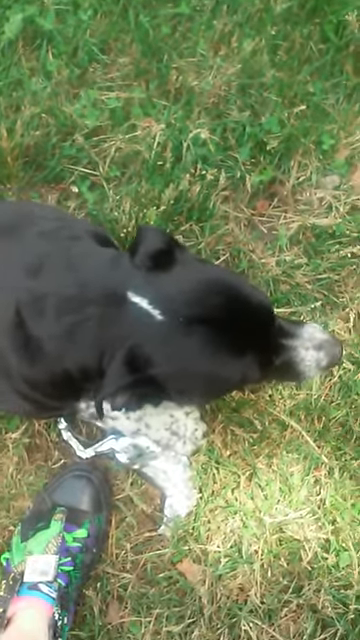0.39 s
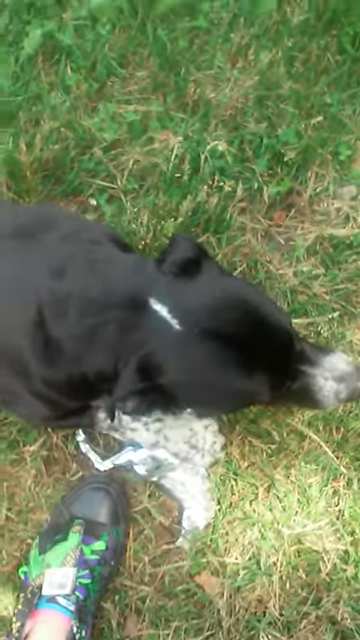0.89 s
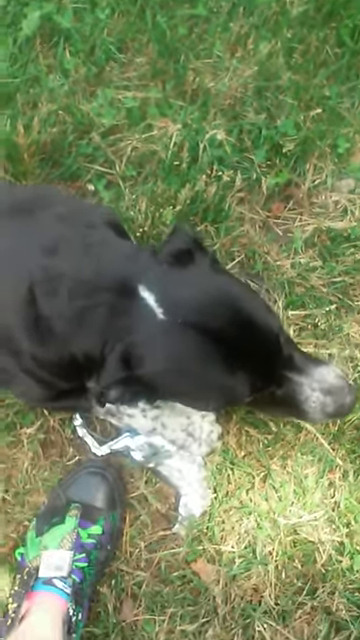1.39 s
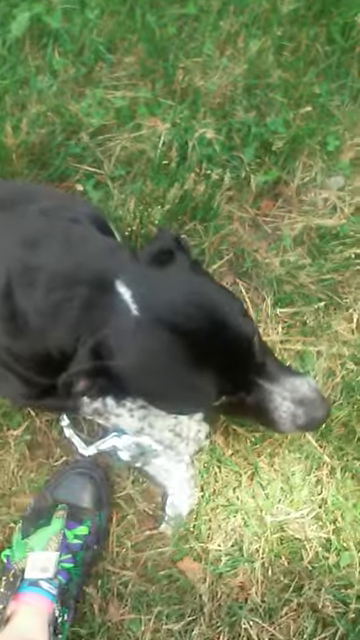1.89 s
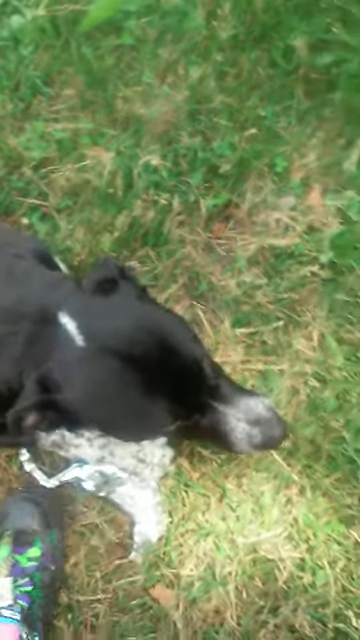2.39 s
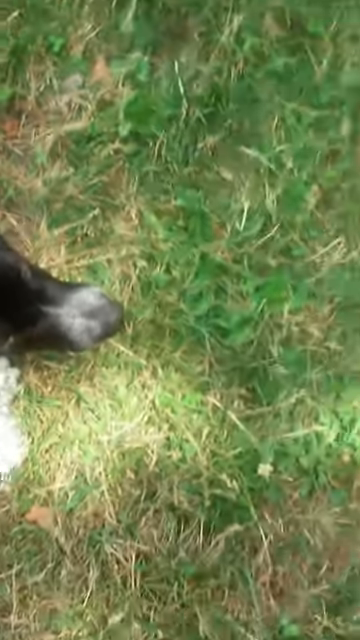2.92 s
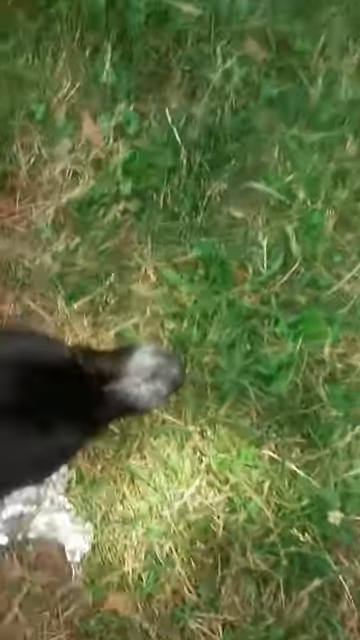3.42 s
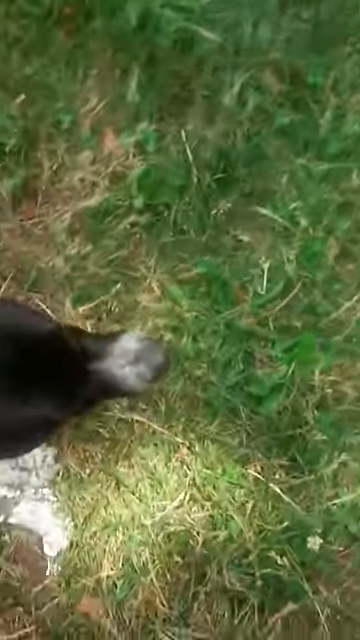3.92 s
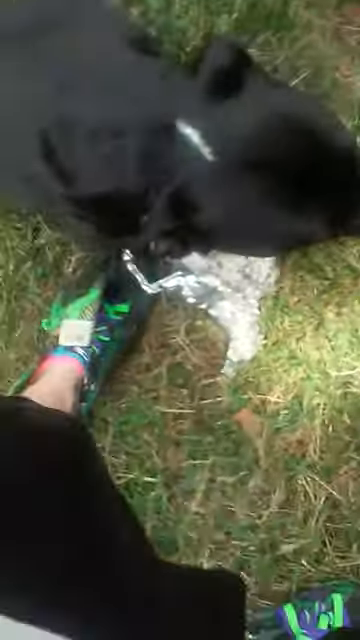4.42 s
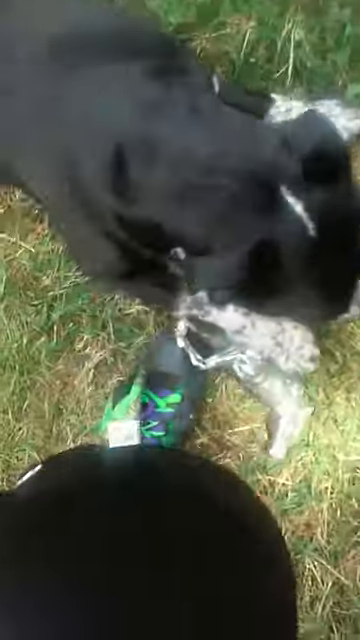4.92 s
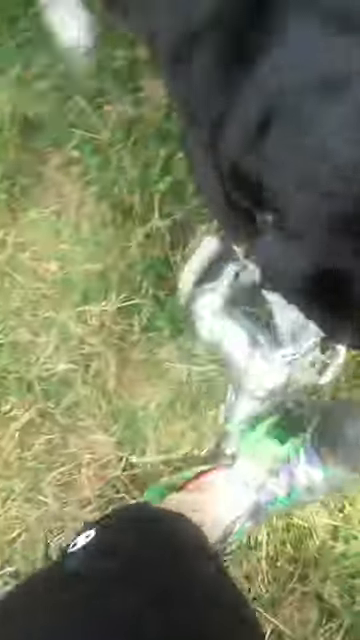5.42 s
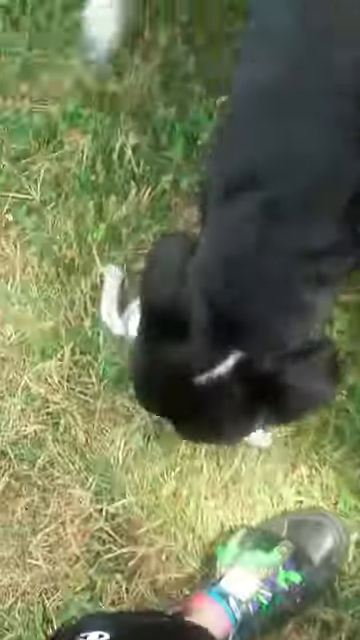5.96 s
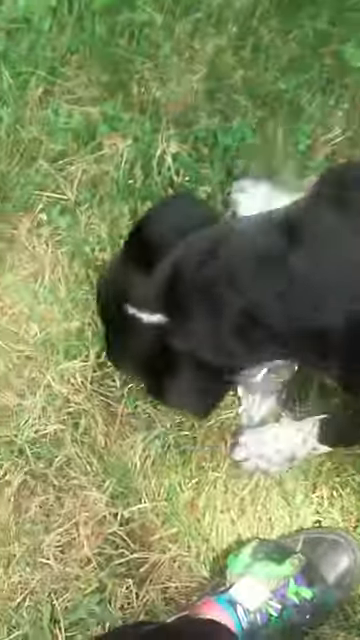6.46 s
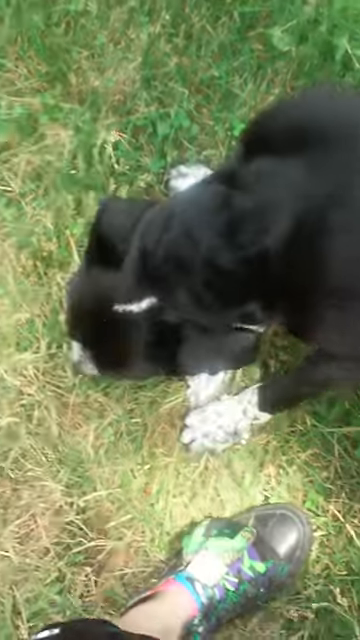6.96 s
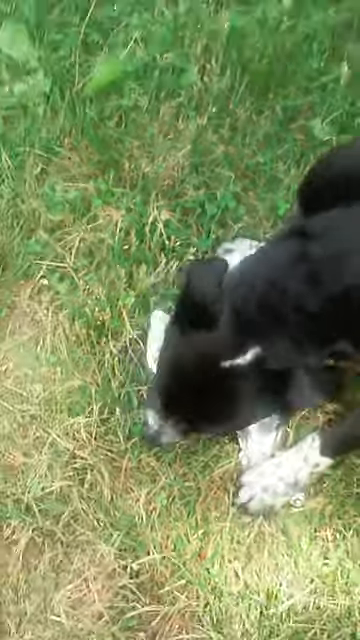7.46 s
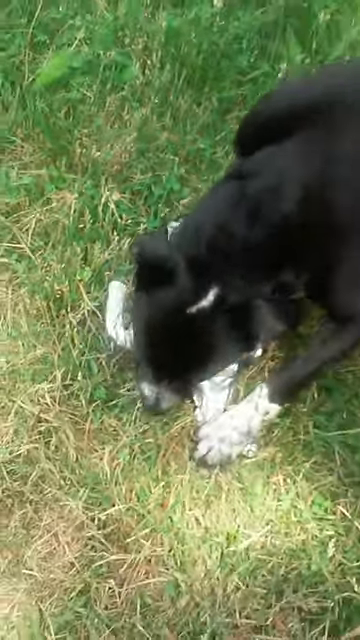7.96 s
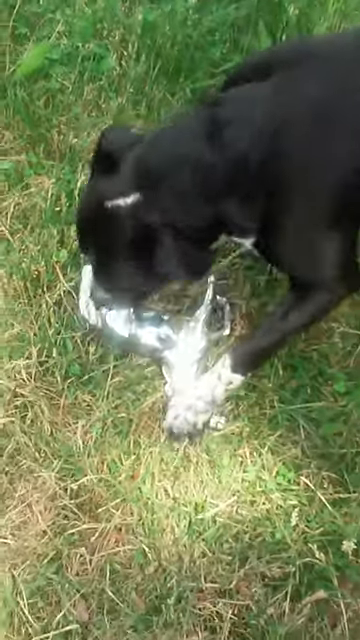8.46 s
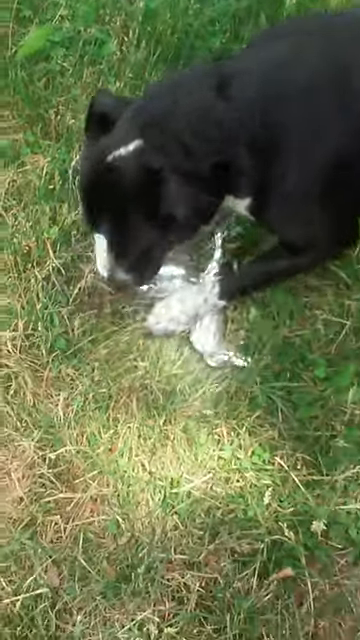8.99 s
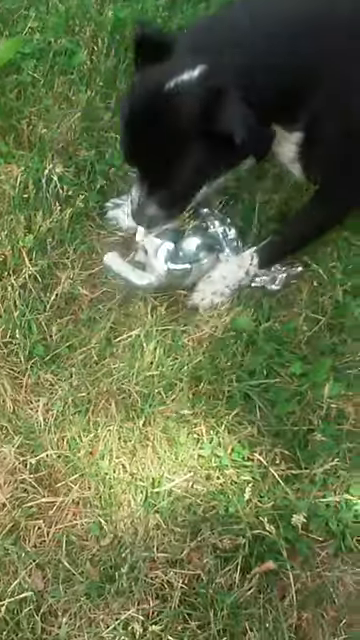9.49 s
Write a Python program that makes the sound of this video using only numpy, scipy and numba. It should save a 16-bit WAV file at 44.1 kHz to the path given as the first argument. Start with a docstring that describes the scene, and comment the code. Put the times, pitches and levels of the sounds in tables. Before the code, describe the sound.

A dog close by growls roughly, yaps sharply and snorts over a toy on dry grass, then gives short muffled grunts with faint collar clinks.

```python
"""Dog growling over its toy on a lawn

A dog close to a phone growls, yaps and grunts: pitched, rough pulses through moving mouth, throat and upper resonances.
Between calls it snorts (low thumps, noise through the nose); struck metal modes clink on its collar.
Dry grass hisses in noise grains that rise with the calls, over outdoor noise, hum, low noise and a yard return.
Loud yaps overload the input."""
import sys
import numpy as np
from scipy import signal
from scipy.io import wavfile
from scipy.ndimage import uniform_filter1d, minimum_filter1d
from numba import njit

SR = 44100
rng = np.random.default_rng(int(sys.argv[2]) if len(sys.argv) > 2 else 0)


def wav_record(signal):
    """Record a signal, one row per channel, as 16-bit PCM in the file named by sys.argv[1]."""
    frames = np.transpose(np.atleast_2d(signal))
    bounded = np.clip(frames, -1, 1)
    # unit amplitude maps onto the largest positive 16-bit level
    quanta = np.round(bounded * 32767).astype(np.int16)
    wavfile.write(sys.argv[1], SR, quanta)


def rack_gain(trim_db):
    """Turn a fader trim in dB into the linear factor to multiply a signal by."""
    fader = np.asarray(trim_db, float)
    return 10 ** (fader / 20)


N = 423801
TIME_S = np.arange(N) / SR


def rms_one(x):
    """Scales to rms 1."""
    return x / np.sqrt(np.mean(x ** 2) + 1e-20)


def evened(x):
    """Level held near rms 1 over 30 ms, so that a gain curve alone sets loudness."""
    return x / np.sqrt(uniform_filter1d(x ** 2, size=1300) + 1e-12)


def in_time(rows):
    """Interpolates each column over the first one, time [s]."""
    s, *columns = np.transpose(rows)
    return [np.interp(TIME_S, s, c) for c in columns]


def cut(x, hz, kind, order=2):
    """Butterworth filter."""
    return signal.sosfilt(signal.butter(order, hz, kind, fs=SR, output="sos"), x)


def lagged(x, seconds):
    """One-pole lag."""
    r = np.exp(-1 / (seconds * SR))
    return signal.lfilter([1 - r], [1, -r], x)


def settling(gain, db_per_s):
    """Follows a rise at once and sinks at no more than a steady rate."""
    ramp = db_per_s * TIME_S
    return rack_gain(np.maximum.accumulate(20 * np.log10(gain + 1e-6) + ramp) - ramp)


def swells(rows, attack_s, release_s):
    """Sum of attack, hold and release shapes; rows: start [s], length [s], level [dB]."""
    out = np.zeros(N)
    for s, length_s, db in rows:
        corners_s = [s - attack_s, s, s + length_s, s + length_s + release_s]
        out += rack_gain(db) * np.interp(TIME_S, corners_s, [0, 1, 1, 0]) ** 2
    return out


def drift(rate_hz):
    """Random wander of rms 1: white noise through two equal low-pass poles."""
    r = np.exp(-2 * np.pi * rate_hz / SR)
    wander = signal.lfilter([1], [1, -2 * r, r * r], rng.standard_normal(N + SR))
    return rms_one(wander[SR:])


def coloured(spectrum, patchy_db):
    """Third-octave bands of noise, each at its level and with its own flicker; rms 1."""
    hz, db = np.transpose(spectrum)
    edges_hz = 25 * 2 ** np.arange(0, 9.6, 1 / 3)
    white = rng.standard_normal((2, N))
    out = 0
    for k, (low, high) in enumerate(zip(edges_hz, edges_hz[1:])):
        level_db = np.interp(np.log(low * high) / 2, np.log(hz), db, left=-90, right=-90)
        out = out + rack_gain(level_db + patchy_db * drift(29)) * cut(white[k % 2], [low, high], "band")
    return rms_one(out)


@njit
def resonate(x, hz, width_hz, sr):
    """Two-pole resonance whose centre may move; gain 1 on top."""
    y, r = np.zeros(len(x)), np.exp(-np.pi * width_hz / sr)
    for i in range(2, len(x)):
        driven = (1 - r * r) / 2 * (x[i] - x[i - 2])
        y[i] = driven + 2 * r * np.cos(2 * np.pi * hz[i] / sr) * y[i - 1] - r * r * y[i - 2]
    return y


def tract(x, shapes):
    """Fixed resonances in parallel, signs alternating."""
    out = np.zeros(N)
    for k, (hz, width_hz, db) in enumerate(shapes):
        out += (-1) ** k * rack_gain(db) * resonate(x, np.full(N, float(hz)), width_hz, SR)
    return out


def struck(times_s, levels_db, modes, spread_db):
    """Each blow rings every decaying mode with a strength of its own."""
    out, at = np.zeros(N), (np.array(times_s) * SR).astype(int)
    chance = rng.standard_normal((len(at), len(modes)))
    for k, (hz, db, t60_s) in enumerate(modes):
        clicks = np.full(N, 1e-18)
        clicks[at] = rack_gain(levels_db + db + spread_db * chance[:, k])
        r, w = rack_gain(-60 / (t60_s * SR)), 2 * np.pi * hz / SR
        out += signal.lfilter([0, np.sin(w)], [1, -2 * r * np.cos(w), r * r], clicks)
    return out


def calls():
    """Every yap, grunt and growl as rows of time [s], pitch [Hz], effort [dB], in order."""
    # lone yaps: (start [s], top pitch [Hz], effort [dB], stretch of the shape)
    lone_yaps = [(0.452, 462.8, -5, 0.97), (0.985, 463.4, -4.5, 0.98), (1.517, 447.6, -4.5, 0.99),
                 (6.312, 501.6, -2.5, .93)]
    # shape shared by the yaps: (time before stretch [s], share of top pitch, level re effort [dB])
    yap_shape = [(0, .25, -34.5), (.02, .55, -7), (.045, .86, -3.5), (.08, 0.99, 1), (.16, .97, 2.5),
                 (.2, .62, -16.5), (.245, .27, -26), (0.312, .22, -46.5)]
    # short grunts: (start [s], length [s], top pitch [Hz], effort [dB])
    short_grunts = [(-.07, .265, 222, -15), (5.535, .09, 199.3, -37.5), (6.717, .16, 236, -20),
                    (7.033, .135, 236, -18), (7.195, .08, 165, -30), (7.322, .135, 238, -19),
                    (8.081, .075, 200, -45.5), (8.504, .095, 240, -23.5), (8.726, .235, 236, -15),
                    (9.098, .255, 262, -15.5), (9.498, .2, 258, -18)]
    # long growls, some flipping up into a yap, one table each: (time [s], pitch [Hz], effort [dB])
    growls = [
        [(2.075, 100.1, -33.5), (2.145, 106.7, -28.5), (2.181, 187.8, -21), (2.365, 177, -23),
         (2.555, 193.7, -28.5), (2.59, 168, -48.5)],
        [(2.8, 178.7, -41.5), (2.852, 213, -13.5), (3.086, 213, -17), (3.126, 238.4, -11), (3.205, 460.2, -0.5),
         (3.3, 483.2, -0.5), (3.334, 329.3, -14.5), (3.528, 262.1, -11), (3.59, 204.6, -54)],
        [(3.875, 201, -37.5), (3.915, 221.3, -8.5), (3.971, 414.4, -2), (4.033, 502.5, 5.5),
         (4.115, 314.8, -14), (4.443, 307.8, -10), (4.52, 415.3, -5), (4.575, 453, -1.5), (4.61, 324.2, -4),
         (4.68, 321, -18), (4.73, 201.9, -34)],
        [(4.745, 170.3, -26), (4.779, 162, -19.5), (4.951, 146.6, -31.5), (5.01, 144.8, -51)],
        [(5.04, 198.8, -38.5), (5.052, 293, -3.5), (5.089, 472, -5), (5.141, 514.4, -3.5), (5.17, 474.9, -6),
         (5.19, 399.2, -15.5), (5.24, 235, -20), (5.29, 225.2, -8), (5.38, 200, -14.5), (5.49, 157.3, -32),
         (5.505, 151.3, -49.5)],
        [(5.76, 227.2, -51.5), (5.794, 303.6, -11), (5.978, 340, -9.5), (6.148, 208, -23.5),
         (6.17, 184.8, -59.5)],
    ]
    out = [list(map(tuple, g)) for g in growls]
    for s, hz, db, stretch in lone_yaps:
        out.append([(s + stretch * after, hz * share, db + under) for after, share, under in yap_shape])
    for s, length_s, hz, db in short_grunts:
        end_s = s + length_s
        out.append([(s, hz * .66, db - 21),
                    (s + min(.058, length_s / 2), hz, db),
                    (end_s - min(.05, length_s / 2.2), hz * .94, db - 7),
                    (end_s, hz * .52, db - 28.5)])
    return sorted(out)


def effort():
    """Pitch [Hz], pressure gain and the on-off gate of the voice."""
    every_call = calls()
    rows = np.concatenate(every_call).astype(float)
    rows[:, 2] = rack_gain(rows[:, 2] / 2)   # swells run between even dB and even pressure
    pitch_hz, root = in_time(rows)
    sounding = np.zeros(N)
    for c in every_call:
        start_s, end_s = c[0][0], c[-1][0]
        sounding += np.interp(TIME_S, [start_s - .008, start_s, end_s, end_s + .03], [0, 1, 1, 0])
    return pitch_hz, root ** 2, np.minimum(sounding, 1)


def background_opening():
    """Background opening, 0-1: rises at once with each call, then sinks steadily in dB."""
    _, gain, sounding = effort()
    half_open_db = -18
    return settling(sounding * gain / (gain + rack_gain(half_open_db)), db_per_s=127.5)


def larynx(pitch_hz):
    """The folds hold each setting until the next; high pitch locks them and clears the voice."""
    # (from time [s], roughness [0-1], flutter of the loose folds [0-1])
    settings = [(0, .25, .2), (.3, .7, .15), (2.0, .55, .5), (2.16, .3, 1), (2.7, .2, .4), (3.14, .8, .25),
                (3.43, .35, 0), (3.7, .8, .5), (4.72, .9, .6), (5.6, .8, .8), (6.07, .3, .2),
                (6.25, .8, .2), (6.68, .28, .2), (7.18, 1, .5), (7.31, .35, .25), (8.79, .2, .2),
                (9.0, .65, .45), (9.25, .35, .2)]
    since_s, *columns = np.transpose(settings)
    now = np.searchsorted(since_s, TIME_S, "right") - 1
    rough, flutter = (uniform_filter1d(c[now], size=1300) for c in columns)
    flip_hz, flip_settles_s, flip_rough = 410, .028, .13
    flip = 1 / (1 + np.exp((flip_hz - pitch_hz) / 12))
    flip = np.minimum(flip, lagged(flip, flip_settles_s))
    return flip, rough + flip * (flip_rough - rough), flutter * (1 - flip)


def glottis(pitch_hz, rough, flutter, flap):
    """Pitch cycles made unsteady by flutter and roughness: pulse size, cosine phase and leaking air."""
    jitter = .07 * flutter * flap + .25 * rough ** 1.5 * drift(70)
    cycles = np.cumsum(pitch_hz * (1 + jitter)) / SR
    chance_per_cycle = rng.standard_normal(N)[(cycles + .5).astype(int)]
    size = rack_gain(2.6 * rough * chance_per_cycle)
    wave = np.cos(2 * np.pi * cycles)
    puff = rng.standard_normal(N) * (1.3 + wave)   # air leaks while the folds are open
    return size, wave, puff


def mouth_and_throat(source, breathy, pitch_hz, rough, sounding, down):
    """The mouth resonance opens to the second harmonic and closes late, beside throat and pharynx."""
    # below the mouth resonance: (centre [Hz], width [Hz], level [dB])
    throat_shape = [(381.5, 61, -7.5)]
    # breathy resonances, head raised and head bent: (centre [Hz], width [Hz], level [dB])
    pharynx_up = [(582.7, 85, -0.11), (1202, 203, 0.95)]
    pharynx_down = [(696, 1700, -30.5), (1150, 2300, -19)]
    shut_hz, tunes_to_harmonic, closes_s, width_hz = 724, 2.11, .011, 84
    jaw_hz = np.maximum(shut_hz, tunes_to_harmonic * pitch_hz)
    mouth_hz = np.maximum(jaw_hz, shut_hz + lagged(sounding * (jaw_hz - shut_hz), closes_s))
    mouth = resonate(source, mouth_hz, width_hz, SR)
    mouth -= (1.3 - rough + .38 * down) * tract(source, throat_shape)
    mouth = np.where(down, cut(mouth, 844, "low", order=4), mouth)   # the toy muffles the bent head
    mouth -= .5 * np.where(down, tract(breathy, pharynx_down), tract(breathy, pharynx_up))
    return cut(cut(mouth, 260, "high", order=4), 1096, "low", order=6)


def upper_resonances(breathy, third_hz, down):
    """A moving third resonance and, above it, fixed ones that depend on the posture."""
    # head raised and head bent: (centre [Hz], width [Hz], level [dB])
    upper_up = [(2285, 110, -15.5), (2877, 81, -12.5), (3700, 130, -43)]
    upper_down = [(2730, 84, -37), (3230, 420, -19), (4130, 73, -13.5)]
    third = resonate(breathy, third_hz, 310.0, SR)
    third = resonate(third, third_hz, 310.0, SR)   # twice: dark valleys beside it
    upper = third - np.where(down, tract(breathy, upper_down), tract(breathy, upper_up))
    return cut(upper, 1400, "high", order=6)


def rasp(puff, pitch_hz, throat_gain):
    """Turbulence: grows steeply with effort up to a cap, only when the voice flips up into a yap."""
    noise = evened(cut(cut(puff, [2500, 7500], "band"), 4200, "low", order=1))
    level_db = -32 + 5.1 * (20 * np.log10(throat_gain) + 2.56)
    return rack_gain(np.minimum(level_db, -24)) * noise / (1 + np.exp((400 - pitch_hz) / 15))


def exhale(flip, throat_gain):
    """Band of noise that lags behind a yap: air rushing out."""
    noise = rms_one(cut(rng.standard_normal(N), (2300, 6450), "band"))
    return rack_gain(-33.5) * lagged(flip * np.minimum(throat_gain, 1), .12) * noise


def voice():
    """Glottal pulses, unsteady and breathy when rough, through mouth, throat and upper resonances."""
    # posture: (time [s], third resonance [Hz], chest toward the microphone [dB], muzzle toward it [dB])
    neck = [(0.1, 1830, 7, 2), (0.55, 1580, 6, -2), (1.1, 1750, 7, -6), (1.65, 1950, 2.5, -5.5),
            (2.3, 1843, 2.3, -3), (3.0, 1920, 5.5, -2.1), (3.4, 1866, 3.5, -7.7), (4.3, 1870, 3.5, -10.5),
            (4.85, 1440, 2.5, 0), (5.3, 1610, 4.7, -7), (5.95, 1315, 5.5, -9.5), (6.45, 1610, 4.7, -6.5),
            (7.1, 1590, 0, -7.3), (7.4, 1499, -1, -7.5), (8.55, 1700, -6, -3.5), (8.85, 1683, 1.3, -6.5),
            (9.2, 1860, -3.5, -8.5), (9.6, 1925, -5, -9.5)]
    head_down_s = 6.69   # the head bends over the toy
    pitch_hz, throat_gain, sounding = effort()
    down = TIME_S > head_down_s
    third_hz, chest_db, muzzle_db = in_time(neck)
    flip, rough, flutter = larynx(pitch_hz)

    # the fundamental leads the effort and levels off at a ceiling that sinks with pitch
    low_leads_s, low_over_db, low_db_per_octave, low_flip_db = .0051, 8, 11.5, 21.5
    soft = rack_gain(low_over_db) * np.interp(TIME_S + low_leads_s, TIME_S, throat_gain)
    octaves = np.log2(np.maximum(pitch_hz, 200) / 200)
    ceiling_db = np.where(down, -13, -23) - low_db_per_octave * octaves + low_flip_db * flip + chest_db
    ceiling = rack_gain(ceiling_db)
    low_gain = soft * ceiling / np.hypot(soft, ceiling)

    # upper resonances: breath lingers, the open jaw lets more out
    linger_db, linger_s, upper_rough_db, upper_flip_db = 2.5, .21, -1, 7
    lingering = throat_gain + rack_gain(linger_db) * lagged(sounding * throat_gain, linger_s)
    upper_db = np.where(down, -12.5, -21.5) + upper_rough_db * rough + upper_flip_db * flip + muzzle_db
    upper_gain = rack_gain(upper_db) * lingering

    # loose tissue beats against the folds
    flap = np.sin(2 * np.pi * np.cumsum(24.16 * (1 + .1424 * drift(4.35))) / SR)
    size, wave, puff = glottis(pitch_hz, rough, flutter, flap)
    pulses = .36 / (1.64 - 1.6 * wave) - 1   # a rounded pulse each cycle
    source = size * (pulses + 5 * rough * puff)
    snap = .0975 / (1.9025 - 1.9 * wave) - 1   # sharp closure
    breathy = size * ((1 - .7 * rough) * snap + 9 * (rough + .12) * puff)

    throat = mouth_and_throat(source, breathy, pitch_hz, rough, sounding, down)
    upper = upper_resonances(breathy, third_hz, down)
    low = np.sqrt(2) * (1 - .75 * rough) * evened(cut(size, 90, "low") * wave)
    chest = rack_gain(2) * rough * evened(cut(source, [80, 300], "band"))   # rough calls spread below the pitch
    layers = low_gain * (low + chest) + throat_gain * evened(throat) + upper_gain * evened(upper)
    throb = cut(flap, 60, "low") + .5 * drift(20)   # the flutter throbs in the level too
    layers *= rack_gain(3.5 * flutter * throb)
    return exhale(flip, throat_gain) + sounding * (layers + rasp(puff, pitch_hz, throat_gain))


def grass():
    """Dry blades: bright hiss broken into dense grains, rising with each call and in short swells."""
    # hiss spectrum before scaling to rms 1: (frequency [Hz], density [dB per Hz])
    blades = [(3240, -66.5), (5500, -25), (6790, -30), (8570, -7), (9300, -17.5), (12400, 0.5),
              (13100, 7.5), (15100, 1.5), (16000, -11), (16400, -23)]
    # hiss during a call: (time [s], level [dB])
    call_hiss = [(0, -27), (1.6, -29.5), (2.3, -29.5), (3.3, -27), (4.0, -25), (4.5, -31), (5.5, -23),
                 (6.4, -26), (7.4, -24.5), (7.8, -23), (8.06, -48), (8.46, -26.5), (9.2, -23),
                 (9.61, -25.5)]
    # short swells of bright hiss; those at 8.14, 8.27 and 8.38 s build a gradual rise:
    # (start [s], length [s], level [dB])
    hiss_swells = [(.85, 0.052, -37.5), (1.42, 0.029, -37), (3.5, 0.052, -32.5), (3.69, .08, -26.5),
                   (4.755, .2, -23), (5.52, 0.035, -25), (5.655, 0.0099, -14.5), (5.742, 0.0083, -11.5),
                   (5.79, 0.081, -36), (6.14, 0.011, -26), (6.2, 0.094, -41), (6.64, 0.11, -29),
                   (7.23, 0.033, -30.5), (7.72, 0.022, -56), (7.83, .02, -57), (8.14, .12, -51),
                   (8.27, 0.077, -42), (8.38, .12, -35.5), (8.6, 0.079, -52), (8.742, 0.012, -31),
                   (8.92, .09, -27), (9.15, 0.13, -32.5), (9.37, 0.13, -36)]
    grains = rack_gain(2.4 * drift(300) + 1.9 * drift(33))
    between_calls_db = -26.5
    with_calls = rack_gain(in_time(call_hiss)[0]) * (rack_gain(between_calls_db) + background_opening())
    swelling = settling(swells(hiss_swells, attack_s=.023, release_s=.01), db_per_s=350)
    return (with_calls + swelling) * evened(coloured(blades, patchy_db=3.0) * grains)


def garden():
    """Far outdoor noise, a thin hum, and low noise that rises with each call and in gusts."""
    # outdoor noise before scaling to rms 1: (frequency [Hz], density [dB per Hz])
    air = [(15, -46), (25, -56.5), (104, 12), (203, -13), (457, -14), (661, -18.5), (1320, -29.5),
           (1820, -33), (2440, -28.5), (5110, -44), (9000, -26), (11700, -59.5), (19800, -120)]
    # a far machine: (frequency [Hz], level before wander [dB])
    machine = [(300, -65)]
    # gusts on the microphone: (start [s], length [s], level [dB])
    gusts = [(-.05, 0.14, -30), (.7, 0.64, -40), (4.7, .18, -27), (7.18, 0.082, -36), (8.6, 0.27, -43)]
    hum = np.zeros(N)
    for hz, db in machine:
        hum += np.sqrt(2) * rack_gain(db + 4.9 * drift(1.5)) * np.sin(2 * np.pi * hz * TIME_S)
    low_noise_db, between_calls_db = -49, -10.5   # low noise rises with each call; drop between calls
    low_gain = rack_gain(low_noise_db) * (rack_gain(between_calls_db) + background_opening())
    low_gain = low_gain + swells(gusts, attack_s=.065, release_s=.11)
    low_gain = low_gain * rack_gain(3.7 * drift(6.9))
    low_noise = low_gain * rms_one(cut(rng.standard_normal(N), [55, 95], "band"))
    return rack_gain(-49) * coloured(air, patchy_db=1.5) + hum + low_noise


def yard(dog):
    """Scattered return from fences and walls: convolution with decaying noise after a gap."""
    t60_s, gap_s, level_db = .63, .025, -19
    t = np.arange(SR) / SR
    scatter = rng.standard_normal(SR) * rack_gain(-60 * t / t60_s) * (t > gap_s)
    scatter /= np.sqrt(np.sum(scatter ** 2))
    return rack_gain(level_db) * signal.fftconvolve(cut(dog, [280, 3300], "band"), scatter)[:N]


def snorts():
    """Soft-palate flaps: a low thump each and a puff ringing the nose; one long gasp is hoarse noise."""
    # flaps as air is drawn in: (time [s], level [dB], nose re level [dB])
    palate_flaps = [(0.809, -14, -4.5), (0.84, -11, -10), (0.872, -12.5, -2), (1.401, -12, -3.5),
                    (1.432, -12.5, -15.5), (1.931, -15, 1), (1.972, -21.5, -2), (3.697, -11, 2.5),
                    (3.735, -11, 2), (3.769, -22, -7), (7.588, -25, -22), (7.879, -33, -33.5)]
    # thump: (frequency [Hz], level [dB], t60 [s])
    thump_modes = [(153, -0.5, 0.023), (266.6, -1.5, 0.0067)]
    # air in the nose: (centre [Hz], width [Hz], level [dB])
    nose_shape = [(730, 330, 3), (1127, 130, 8.5), (2070, 180, -1), (2980, 420, -12.5)]
    # one intake: (start [s], full [s], fading [s], end [s], level [dB], centre [Hz], width [Hz])
    intake = (4.745, 4.79, 4.95, 5.01, -31, 3050, 1250)
    s, db, nose_db = np.transpose(palate_flaps)
    flaps = np.full(N, 1e-18)
    flaps[(s * SR).astype(int)] += rack_gain(db + nose_db)
    fade = rack_gain(-60 / (.16 * SR))   # t60 0.16 s
    puff_gain = cut(signal.lfilter([1], [1, -fade], flaps), 50, "low")
    puffs = puff_gain * rms_one(tract(rng.standard_normal(N), nose_shape))
    *times_s, gasp_db, hz, width_hz = intake
    band_hz = [hz - width_hz / 2, hz + width_hz / 2]
    hoarse = rack_gain(3.3 * drift(30)) * rms_one(cut(rng.standard_normal(N), band_hz, "band", order=3))
    gasp = rack_gain(gasp_db) * np.interp(TIME_S, times_s, [0, 1, 1, 0]) * hoarse
    thumps = struck(s + .005, db + 3, thump_modes, spread_db=1)
    return cut(thumps, [90, 380], "band") + rack_gain(-11.5) * puffs + gasp


def tags():
    """Metal tags knock together: a short tick and, when they hang free, ringing modes."""
    # knocks: (time [s], level [dB], ring re level [dB])
    clinks = [(1.939, -30.5, -18.5), (4.4518, -36.5, -29.5), (5.0548, -49, -45), (5.6531, -33, -6),
              (5.7418, -19, -18.5), (5.8032, -19.5, -15.5), (6.1459, -26.5, -31), (6.6635, -34, -41),
              (7.2379, -14.5, -32.5), (7.8345, -42.5, -38), (8.7428, -21.5, -10.5), (8.9346, -18, -28),
              (9.218, -34, -11)]
    # ringing modes: (frequency [Hz], level [dB], t60 before damping by fur [s])
    tag_modes = [(2600, -1.5, 0.35), (3370, 3, 0.1), (4010, -2.5, 0.2), (4400, -3.5, 0.09),
                 (5600, -4.5, 0.087), (4520, -7, 0.18), (7150, -5, 0.14), (7700, -21, 0.63),
                 (8419, -18, 0.033), (8635, -6.5, 0.08), (9500, 1, 0.05), (9000, -14, 0.22),
                 (10220, 6, 0.26)]
    rattle_s, rattle_loss_db = .0092, 9
    s, db, ring_db = np.repeat(np.transpose(clinks), 3, axis=1)
    bounce = np.arange(len(s)) % 3   # each clink bounces twice
    s = s + rattle_s * bounce * rng.uniform(.75, 1.25, len(s))
    db = db - rattle_loss_db * bounce
    tick_modes = [(4500, 0, .004), (8500, 0, .006), (13000, 6, .012)]   # Hz, dB, t60 s
    ticks = struck(s, db - 3, tick_modes, spread_db=2)
    since_s = TIME_S - s[np.maximum(np.searchsorted(s, TIME_S) - 1, 0)]
    rings = struck(s, db + ring_db - 5, tag_modes, spread_db=8)
    return ticks + rings / (1 + (since_s / .05) ** 4)   # fur soon stills them


def scene():
    """Dog, its yard return, tags, grass and garden, summed to one channel."""
    dog = voice() + snorts()
    return (dog + yard(dog) + tags() + grass() + garden())[None]


def top_cut(x):
    """Nothing passes above the cut-off."""
    return signal.sosfilt(signal.butter(12, 16840, fs=SR, output="sos"), x)


def record(dry):
    """Microphone input: bass cut, quick peak limiter, a soft knee blended in when loud, and top cut."""
    limit, knee, overload_db, overload_width_db = .95, .82, -6.5, 1.55
    thin = cut(dry, 55, "high")
    peak = -minimum_filter1d(-np.abs(thin), size=301)
    held = thin * uniform_filter1d(np.minimum(1, limit / (peak + 1e-9)), size=301)
    level_db = 10 * np.log10(np.abs(uniform_filter1d(thin ** 2, size=1100)) + 1e-12)
    # share of the saturated signal, at most one half
    over = 1 / (2 + np.exp(np.minimum((overload_db - level_db) / overload_width_db, 50)))
    saturated = thin / (1 + np.abs(thin / knee) ** 5) ** (1 / 5)
    mix = held + over * (saturated - held)
    mix = signal.sosfilt(signal.cheby2(14, 60, 16200, fs=SR, output="sos"), mix)
    return top_cut(mix)


dry = scene()
out = record(dry)
wav_record(out)
```